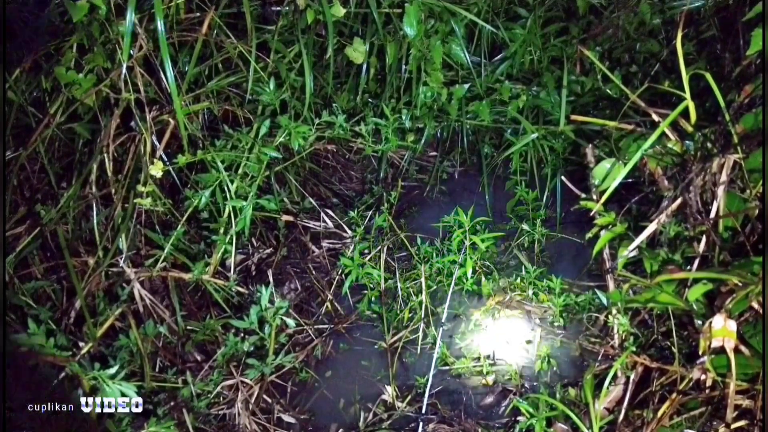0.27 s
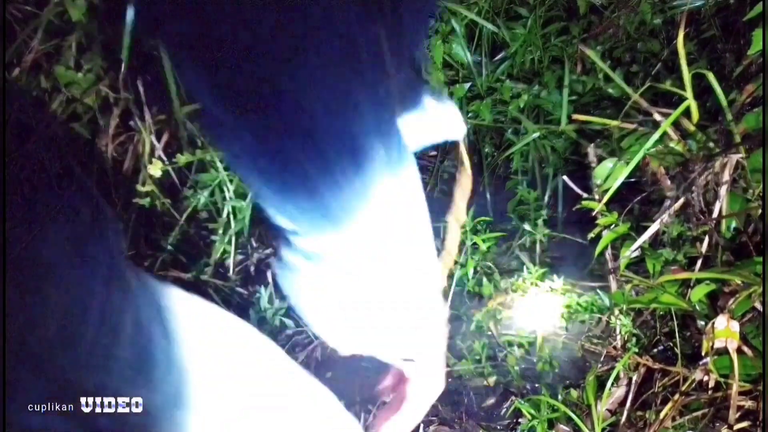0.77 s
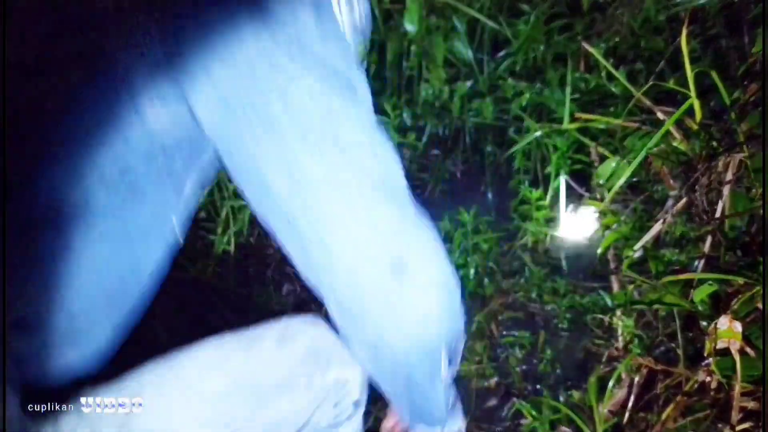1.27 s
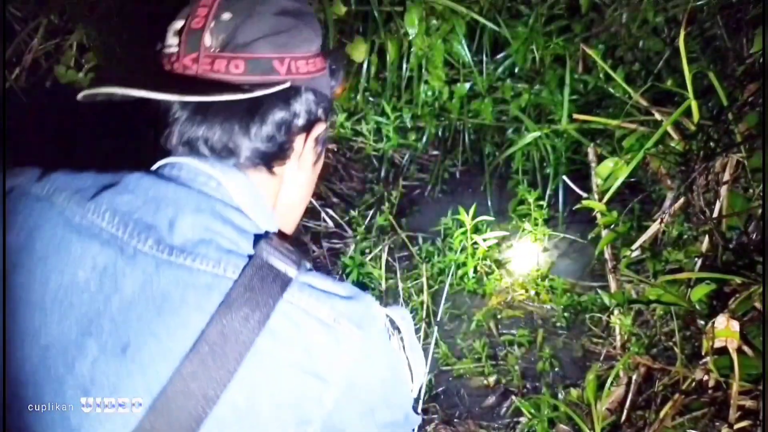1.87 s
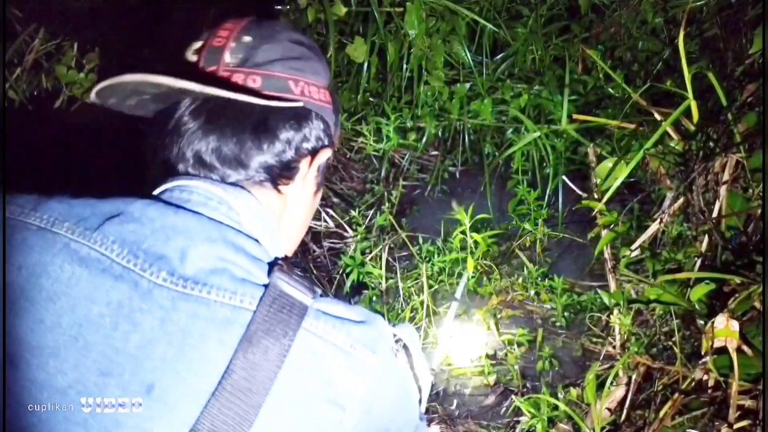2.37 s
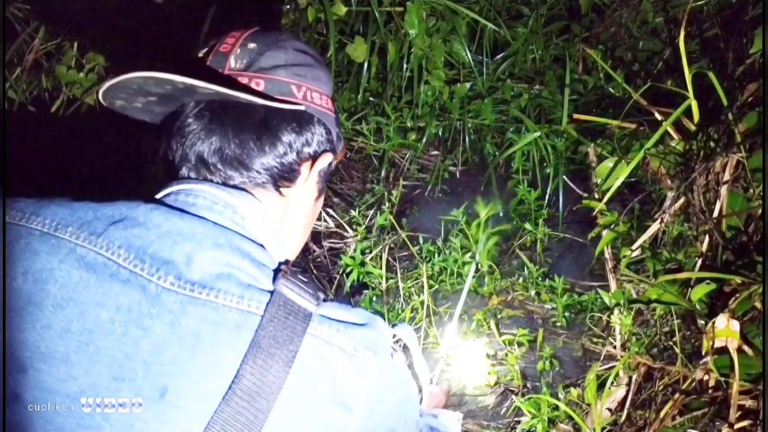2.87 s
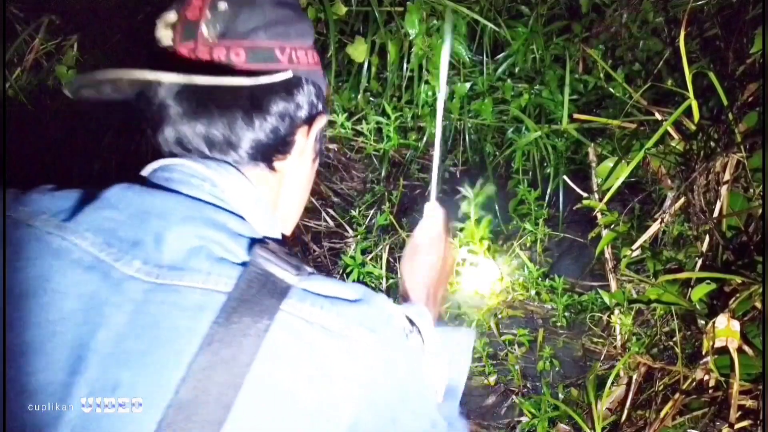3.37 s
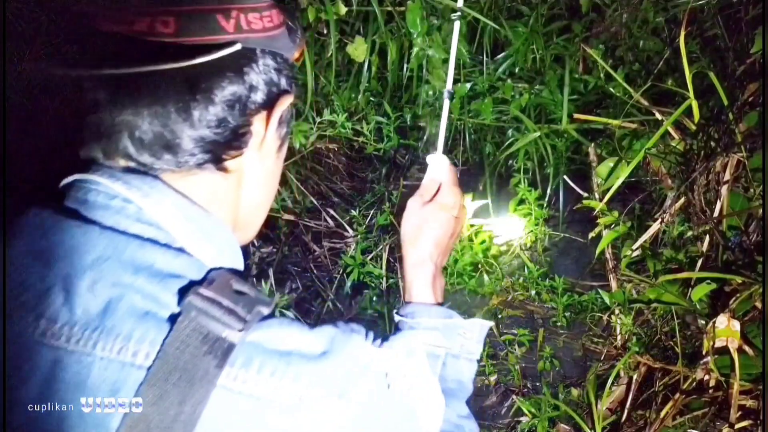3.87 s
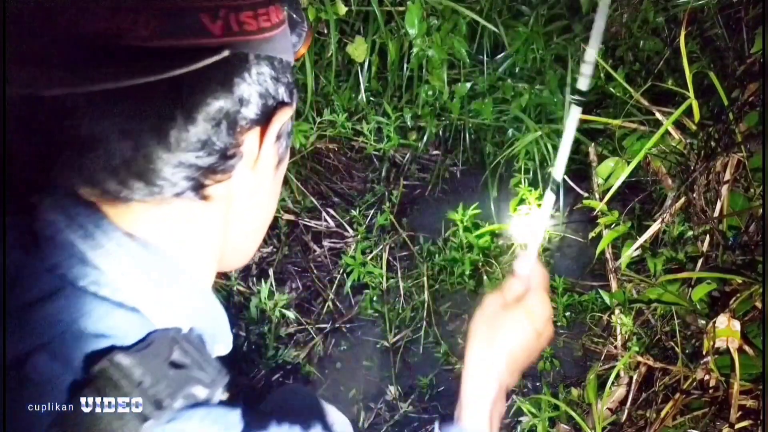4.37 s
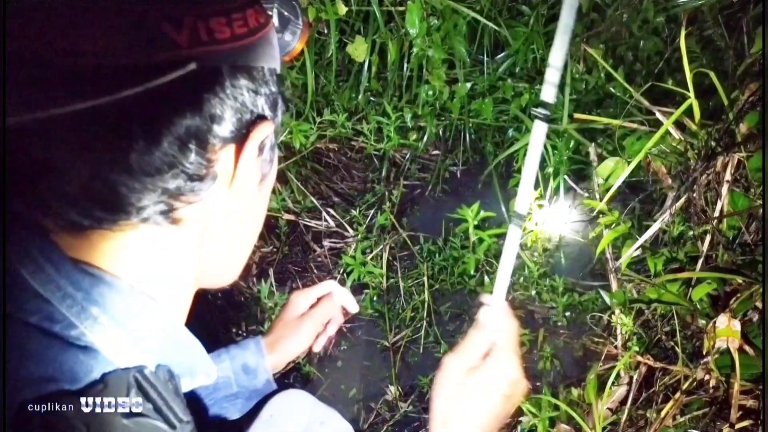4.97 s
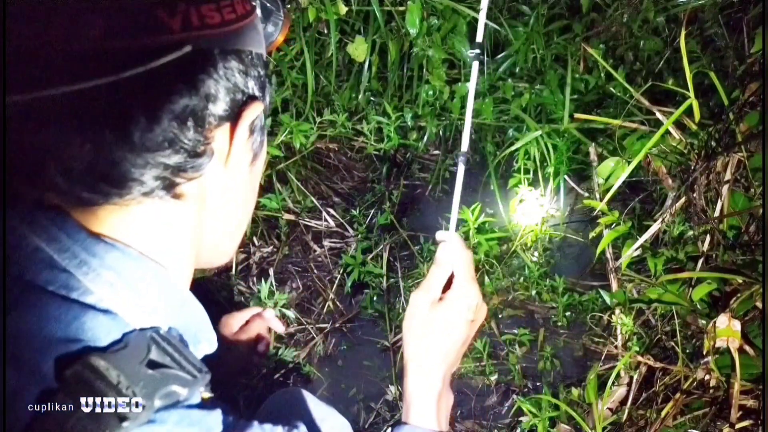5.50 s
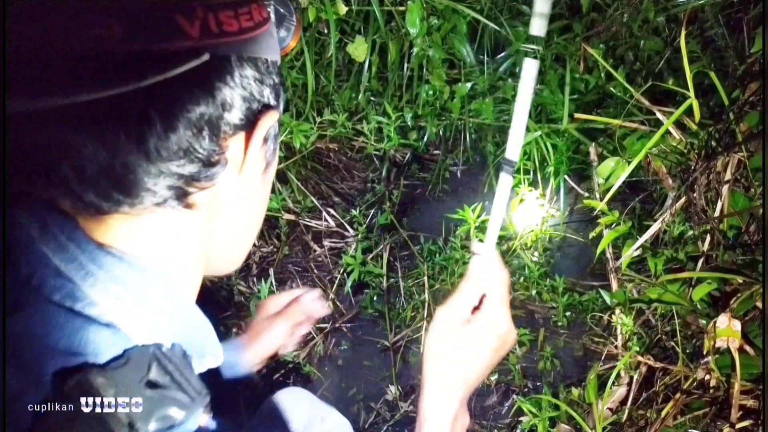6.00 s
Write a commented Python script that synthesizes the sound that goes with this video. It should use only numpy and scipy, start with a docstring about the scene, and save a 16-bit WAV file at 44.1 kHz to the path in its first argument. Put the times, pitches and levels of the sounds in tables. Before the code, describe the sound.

A stereo microphone low in wet grass hears steady high crickets and a blurred frog chorus. Loud piercing chirps, each high then low, come first from nearby on the left, among rustling, crackling grass and dull treads. They stop; softer, echoing whistles and dry rasping runs follow. A closer frog rasps about eight times a second, and small bubbles pop in mud late on.

```python
"""Quick two-note chirps of a frog close by are heard first, over steady crickets; later a farther frog chirps.
Far frogs rasp in overlapping runs that slow as they go, and a near one joins in loudly.
Whistles are gliding sine waves; rasps are clicks that ring a frog's sac and throat; crickets are pulsed tones.
Behind them a chorus croaks and peeps, and a far motor hums. Shaped noise makes the cloth, grass, thuds and air.
Near the end the wet mud gurgles twice, with rising tones and small popping bubbles."""
import sys
import numpy as np
from scipy import signal
from scipy.fft import rfft, irfft
from scipy.io import wavfile
from scipy.ndimage import uniform_filter1d

SR = 44100
rng = np.random.default_rng(int(sys.argv[2]) if len(sys.argv) > 2 else 0)


def master_out(mix):
    """Clip the mix to full scale and print it as 16-bit PCM to the path in sys.argv[1]."""
    frames = np.transpose(np.atleast_2d(mix))
    ceiling = np.clip(frames, -1, 1)
    pcm = np.round(ceiling * 32767).astype(np.int16)
    wavfile.write(sys.argv[1], SR, pcm)


N = 275182
TIME = np.arange(N) / SR  # seconds


def amp(db):
    """Turns decibels into a plain multiplier."""
    return 10 ** (np.asarray(db) / 20)


def unit(x):
    """Scales a sound to an average strength (rms) of 1."""
    return x / np.sqrt(np.mean(x ** 2) + 1e-20)


def read(points, hz):
    """Reads a curve of (pitch, value) points, evenly along the musical scale."""
    f, value = np.transpose(points)
    return np.interp(np.log(hz + 1), np.log(f + 1), value)


def add(mix, s, sound):
    """Adds a sound to the mix from second s, cut off at the end."""
    part = mix[..., max(round(s * SR), 0):][..., :sound.shape[-1]]
    part += sound[..., :part.shape[-1]]


def colour(x, spectrum):
    """Makes each pitch range stronger or weaker by a (pitch_hz, level_db) curve, to rms 1."""
    gain = amp(read(spectrum, np.fft.rfftfreq(N, 1 / SR)))
    return unit(irfft(rfft(x) * gain, N))


def wander(per_s):
    """A smooth random curve of rms 1; a higher per_s makes it move faster."""
    smoothing = 1 + (np.fft.rfftfreq(N, 1 / SR) / per_s) ** 4
    return unit(irfft(rfft(rng.standard_normal(N)) / smoothing, N))


def patchy(x, depth_db, size, order):
    """Lets narrow bands of a noise swell and fade on their own.

    size is the frame in samples; order is how many frames a patch lasts.
    """
    bands = signal.stft(x, nperseg=size)[2]
    field = rng.standard_normal(bands.shape[-2:])
    field = uniform_filter1d(field, order, axis=1)
    field = unit(uniform_filter1d(field, size=6, axis=0))
    return unit(signal.istft(bands * amp(depth_db * field), nperseg=size)[1][..., :N])


def ring(x, modes):
    """Makes a set of (pitch_hz, width_hz, level_db) resonances ring."""
    return sum(amp(db) * unit(signal.lfilter(*signal.iirpeak(hz, hz / width, SR), x))
               for hz, width, db in modes)


def place(x, lead_ms, left_db):
    """Places a sound left or right: lead_ms makes it sooner on the left, left_db louder there."""
    early = np.exp(1j * np.pi * np.fft.rfftfreq(N, 1 / SR) * lead_ms / 1000)
    sides = np.array([early * amp(left_db / 2), amp(-left_db / 2) / early])
    return irfft(rfft(x) * sides, N)


def scatter(x, t60, onset=0.0016):
    """Echoes off stalks and banks build up over onset s, then drop 60 dB in t60 s; each side differs."""
    t = TIME[:SR // 2]
    echoes = rng.standard_normal((2, len(t))) * (rng.random((2, len(t))) < .1)
    echoes *= amp(-60 * t / t60) * np.minimum(t / onset, 1) ** 2
    echoes /= np.linalg.norm(echoes, axis=1, keepdims=True)
    return signal.fftconvolve(np.atleast_2d(x), echoes, axes=1)[:, :N]


def gate(t, length, rise, fall):
    """Opens and shuts a note smoothly; all times in seconds."""
    opening = np.sin(np.pi / 2 * np.clip(t / rise, 0, 1)) ** 2
    closing = np.sin(np.pi / 2 * np.clip((length - t) / fall, 0, 1)) ** 2
    return opening * closing


# blur of the distant chorus, strength at each pitch: pitch_hz, level_db (relative, per Hz)
CHORUS_BLUR = [(100, -20), (250, -13), (500, -15.5), (1050, -16.5), (1600, -11.5), (2600, -11.5),
               (3150, -15), (3900, -9.5), (5750, -22), (7500, -19), (9800, -23), (14400, -19.5),
               (15000, -29), (15800, -35)]
# how alike left and right are: pitch_hz, likeness (0-1)
SIDE_LIKENESS = [(25, 0.34), (70, 0.72), (160, 1), (500, 0.018), (1200, 0.0083), (2500, 0.29),
                 (15000, 0.033)]
# level of the low rumble of the open air over time: time_s, level_db
RUMBLE_LEVEL = [(0, -53.5), (1.1, -50.5), (2.5, -55), (4.6, -52), (5.9, -55)]
# strength of that rumble at each pitch: pitch_hz, level_db (relative, per Hz)
RUMBLE_SPECTRUM = [(20, -3.5), (60, -4), (130, -5), (210, -7), (320, -34), (700, -74)]


def air(blur_db=-47, patch_db=4.5):
    """Open air rumbles low, and the distant chorus melts into an uneven noise."""
    likeness = np.clip(read(SIDE_LIKENESS, np.fft.rfftfreq(N, 1 / SR)), -1, 1)
    left, other = rfft(rng.standard_normal((2, N)))
    right = likeness * left + np.sqrt(1 - likeness ** 2) * other
    noise = irfft(np.array([left, right]), N)
    blur = patchy(colour(noise, CHORUS_BLUR), patch_db, size=1024, order=4) * amp(1.4 * wander(8.3))
    rumble = colour(noise[:, ::-1], RUMBLE_SPECTRUM)  # the same noise backwards
    return amp(blur_db) * blur + amp(np.interp(TIME, *np.transpose(RUMBLE_LEVEL))) * rumble


def motor(pitch_hz=161.7, level_db=-52, nearest_s=3.92, fade_s=1.02):
    """A far motor hums one wavering note; its strength halves within fade_s of its nearest moment."""
    phase = 2 * np.pi * np.cumsum(pitch_hz * (1 + 0.014 * wander(12))) / SR
    nearness = 1 / (1 + ((TIME - nearest_s) / fade_s) ** 2)
    return amp(level_db) * nearness * np.sin(phase) * amp(2.2 * wander(15))


# dry buzz of other insects in the grass: pitch_hz, level_db (relative, per Hz)
INSECT_BUZZ = [(5950, -32), (6300, 6), (7300, 2), (7600, -6), (7950, -10), (8300, 3), (8600, -4.5),
               (9100, -20), (9600, -64)]
# one row per cricket: pitch_hz (middle of its wing tone), level_db
CRICKET_VOICES = [(6490, -49), (6650, -52), (6730, -45.5), (6850, -53), (6940, -49), (7100, -57),
                  (7200, -46), (7300, -58.5)]


def crickets(stroke_hz=55, droop=0.034, swell_db=1.5, throb_db=1.0):
    """Every wing stroke is a short tone that sags in pitch; the grass smears the trills together."""
    out = amp(-46.5) * colour(rng.standard_normal((2, N)), INSECT_BUZZ) * amp(2 * wander(22))
    for pitch_hz, level_db in CRICKET_VOICES:
        stroke_rate = stroke_hz * rng.uniform(.6, 1.5) * (1 + .12 * wander(16.34))
        stroke = np.cumsum(stroke_rate) / SR % 1  # 0-1 through each stroke
        drift = .008 * wander(8) + .006 * wander(160)
        hz = pitch_hz * (1 + droop * (.5 - stroke) + drift)
        tone = np.sin(2 * np.pi * np.cumsum(hz) / SR)
        song = unit(np.sin(np.pi * stroke) ** 4 * tone * amp(swell_db * wander(16.0)))
        direct = place(song, rng.uniform(-0.15, 0.078), rng.uniform(-22.0, 3.7))
        out += amp(level_db) * unit(direct + amp(4) * scatter(song, t60=0.18))
    return out * amp(throb_db * wander(28))


# resonances of a whistling frog's vocal sac: pitch_hz, width_hz, level_db
WHISTLE_SAC = [(2645, 205, .2), (2880, 70, -3)]


def high_note(start_hz, length, tail_s, linger=1.0, climb=0.24, climb_s=0.025, flutter=0.77,
              break_s=0.00081, rise=0.0065):
    """A rising whistle swells as it passes each sac resonance, then breaks into a ragged tail."""
    t = TIME[:int((length + 4 * tail_s) * SR)]
    after = np.maximum(t - length, 0)
    shakes = np.sin(2 * np.pi * (rng.uniform(124, 344, (3, 1)) * t + rng.random((3, 1))))
    shake = shakes.sum(0) / np.sqrt(3)
    broken = 1 - np.exp(-after / break_s)
    hz = start_hz * (1 + climb * (1 - np.exp(-(t - after) / climb_s)))
    sac = np.sqrt(sum(amp(db) ** 2 / (1 + (2 * (hz - f) / width) ** 2) for f, width, db in WHISTLE_SAC))
    phase = 2 * np.pi * np.cumsum(hz * (1 + .02 * broken * shake)) / SR
    tail = broken * linger * np.exp(-after / tail_s) * (1 + flutter * shake)
    level = gate(t, t[-1], rise, tail_s) * (1 - broken + tail)
    return level * sac * (np.sin(phase) + amp(-40) * np.sin(4 * phase))


def croak(hz, pulse_hz=280, width_hz=260):
    """A short rough note: pulsing air through one throat resonance."""
    t = TIME[:int(.024 * SR)]
    puffs = rng.standard_normal(len(t)) * np.sin(np.pi * pulse_hz * rng.uniform(0.75, 1.39) * t) ** 2
    throat = [(hz, width_hz, 0)]
    voice = unit(ring(ring(puffs, throat), throat)) / np.sqrt(2)
    return gate(t, t[-1], t[-1] / 6, t[-1] / 2) * voice


# croaks that stand out from the chorus: start_s, level_db
CLEAR_CROAKS = [(1.465, -33), (1.605, -33.5), (1.886, -37), (2.0186, -33), (2.1763, -32), (6.2, -39)]


def chorus(croaks_per_s=22, croak_db=-49, peeps_per_s=4, peep_db=-50, spread_db=8):
    """Many distant frogs croak and peep at random on either side; a few croaks stand out."""
    sides = np.zeros((2, N))
    for start_s, level_db in CLEAR_CROAKS:
        add(sides[0], start_s, amp(level_db) * croak(1600 * rng.uniform(0.98, 1.06)))
    for when, pitch, size, side in rng.random((int(croaks_per_s * N / SR), 4)):
        one = amp(croak_db + spread_db * size) * croak(1400 + 550 * pitch)
        add(sides[int(2 * side)], when * N / SR, one)
    for when, pitch, size, side in rng.random((int(peeps_per_s * N / SR), 4)):
        one = amp(peep_db + spread_db * size) * high_note(2250 + 250 * pitch, 0.015, 0.0089)
        add(sides[int(2 * side)], when * N / SR, one)
    direct = place(sides[0], lead_ms=0.21, left_db=1.5) + place(sides[1], lead_ms=-0.33, left_db=-1.0)
    return direct + amp(-6.0) * scatter(sides.sum(0), t60=0.1)


# treads on the bank: start_s, level_db (before the thud's rise and fall)
BANK_TREADS = [(0.003, -38), (0.09, -37), (0.31, -43), (1.028, -29), (1.191, -28), (1.389, -38),
               (1.622, -41)]
# strength of a thud at each pitch: pitch_hz, level_db (relative, per Hz)
THUD_SPECTRUM = [(60, -29), (200, 6.5), (350, 2.5), (550, 4), (900, -11), (1500, -4), (3000, -13)]


def treads(rise=0.0059, decay=0.0097):
    """Weight comes down on the soft bank with a dull thud of low noise."""
    out, t = np.zeros(N), TIME[:SR // 10]
    for start_s, level_db in BANK_TREADS:
        thud = colour(rng.standard_normal(N), THUD_SPECTRUM)[:len(t)]
        add(out, start_s, amp(level_db) * thud * gate(t, t[-1], rise, decay) * np.exp(-t / decay))
    return out


# shifts of the body: start_s, rise_s, hold_s, decay_s, cloth_db, grass_db
BODY_SHIFTS = [(0, 0.00043, 0.0069, 0.15, -37, -44), (0.126, 0.054, 0.13, 0.035, -46.5, -45),
               (0.291, 0.31, 1.26, 0.22, -47.5, -56.5), (0.945, 0.069, 0.11, 0.041, -38, -41),
               (1.153, 0.031, 0.019, 0.24, -43.5, -40), (1.23, 0.097, 0.0083, 0.082, -33, -63),
               (1.87, 0.025, 0.0046, 0.018, -35.5, -61), (2.185, 0.086, 0.012, 0.022, -27.5, -41.5),
               (2.288, 0.017, 0.019, 0.02, -28.5, -40), (2.33, 0.03, 0.98, 0.1, -55, -68),
               (3.302, 0.11, 0.084, 0.018, -36.5, -48), (3.496, 0.038, 1.2, 1.8, -47, -67.5),
               (6.081, 0.042, 0.006, 0.044, -39.5, -47.5), (6.185, 0.017, 0.039, 0.03, -49, -53)]


def moving():
    """Gains of cloth and grass: every shift of the body rises, holds and dies away."""
    cloth, grass = np.zeros((2, N))
    for start_s, rise_s, hold_s, decay_s, cloth_db, grass_db in BODY_SHIFTS:
        t = TIME - start_s
        push = np.clip(t / rise_s, 0, 1) ** 2 * np.exp(-np.maximum(t - rise_s - hold_s, 0) / decay_s)
        cloth = np.hypot(cloth, amp(cloth_db) * push)
        grass = np.hypot(grass, amp(grass_db) * push)
    return cloth, grass


# strength of brushing cloth at each pitch: pitch_hz, level_db (relative, per Hz)
CLOTH_SPECTRUM = [(880, -49), (1500, -24), (2900, -2.5), (3170, -16.5), (3500, -3), (5290, -13),
                  (7110, -5.5), (15800, -14.5)]
# strength of crushed grass at each pitch: pitch_hz, level_db (relative, per Hz)
GRASS_SPECTRUM = [(40, -23), (150, -4), (260, 6), (480, 9), (800, 4), (1150, 2), (1600, 4), (2200, 1),
                  (4000, 2.5), (8000, -54)]
# snapping stalks: start_s, level_db (before the left-right balance)
STALK_SNAPS = [(0.186, -34.5), (1.097, -26), (1.112, -37), (1.198, -41), (1.253, -35), (1.326, -31),
               (1.628, -33), (1.648, -37), (1.9, -31), (2.328, -23)]
# strength of a snap at each pitch: pitch_hz, level_db (relative, per Hz)
SNAP_SPECTRUM = [(200, -4), (600, -7), (3000, -11), (7000, 1), (15000, -14)]


def movements(ticks_per_s=400):
    """Cloth brushes in dense grains, grass scrapes and crackles underfoot, and stalks snap."""
    grain = amp(2.6 * wander(400) + 1.8 * wander(40))
    cloth, grass = moving()
    swish = colour(rng.standard_normal((2, N)) * grain, CLOTH_SPECTRUM) * cloth

    ticks = (rng.random(N) < ticks_per_s / SR) * rng.choice([-1, 1], N)
    ticks = ticks * amp(5 * np.minimum(rng.exponential(1, N), 3))  # a few are much stronger
    tick_shape = rng.standard_normal(400) * np.exp(-TIME[:400] / .0015)
    crackle = unit(signal.fftconvolve(ticks, tick_shape)[:N])
    crush = colour(crackle + .5 * grain * rng.standard_normal((2, N)), GRASS_SPECTRUM)
    crush = patchy(crush, 1.2, size=512, order=3) * grass

    t, snaps = TIME[:N // 200], np.zeros((2, N))
    for start_s, level_db in STALK_SNAPS:
        crack = colour(rng.standard_normal((2, N)), SNAP_SPECTRUM)[:, :len(t)]
        add(snaps, start_s, amp(level_db) * crack * np.exp(-t / .002))
    balance = amp([[2.2], [-2.2]])  # louder on the left
    return (swish + snaps) * balance + crush


# mud gurgles: start_s, length_s, pitch_hz (at the start), start_db, end_db
MUD_GURGLES = [(5.68, 0.036, 331, -49.5, -41), (5.704, 0.094, 412, -39.5, -46.5),
               (6.105, 0.053, 298, -46, -50)]
# strength of spitting mud at each pitch: pitch_hz, level_db (relative, per Hz)
SPIT_SPECTRUM = [(200, -37), (700, 9), (1400, 0), (2500, -19), (6000, -25)]
# bubbles popping in the mud: start_s, pitch_hz, level_db (before the pop's rise and fall)
BUBBLE_POPS = [(5.711, 1280, -30.5), (5.788, 1300, -45), (6.131, 710, -38), (6.198, 820, -41)]


def gurgles(shrink=0.9, wobble=0.061, sputter_db=1.0, spit_db=-5, pop_decay_s=0.0054):
    """An air pocket in wet mud shrinks ever faster, so its ring rises; the mud spits and bubbles pop."""
    dry, spray = np.zeros((2, N))
    for start_s, length_s, pitch_hz, start_db, end_db in MUD_GURGLES:
        u = TIME[:int(length_s * SR)] / length_s  # 0-1 through the gurgle
        size = 1 - shrink * u ** 2.7
        hz = pitch_hz / size * (1 + wobble * u * wander(290)[:len(u)])
        phase = 2 * np.pi * np.cumsum(hz) / SR
        tone = np.sin(phase) + amp(-18) * np.sin(2 * phase) + amp(-15) * np.sin(3 * phase)
        level = amp(start_db + (end_db - start_db) * u + sputter_db * wander(200)[:len(u)])
        level = level * signal.windows.tukey(len(u), .1)  # soft ends
        add(dry, start_s, level * tone)
        add(spray, start_s, level * u)
    spits = rng.standard_normal(N) * (rng.random(N) < 500 / SR)
    dry += amp(spit_db) * spray * colour(spits, SPIT_SPECTRUM)
    t = TIME[:int(.04 * SR)]
    for start_s, pitch_hz, level_db in BUBBLE_POPS:
        pop = np.sin(2 * np.pi * pitch_hz * t) * gate(t, t[-1], 0.0014, .01) * np.exp(-t / pop_decay_s)
        add(dry, start_s, amp(level_db) * pop)
    return dry + amp(-10.5) * scatter(dry, t60=0.077)


# far frog's whistles: start_s, level_db (before the sac), length_s, tail_s (decay of the tail)
FAR_WHISTLES = [(2.955, -37.5, 0.0087, .003), (3.284, -28.5, 0.0058, 0.003), (3.638, -33.5, 0.013, .003),
                (3.79, -31.5, 0.0072, 0.0035), (3.902, -32, 0.023, 0.0046), (4.052, -38, .01, 0.0044),
                (4.165, -33, 0.036, .005), (4.429, -31.5, 0.032, .006), (4.687, -31, 0.025, 0.021),
                (4.952, -31.5, 0.034, .006), (5.22, -31.5, 0.032, 0.0034), (5.383, -32.5, 0.011, 0.0035),
                (5.504, -31, 0.027, 0.01), (5.858, -34, 0.01, 0.002)]


def far_frog(grass_db=-7):
    """The far frog gives the high note alone, blurred by echoes in the grass."""
    dry = np.zeros(N)
    for start_s, level_db, length_s, tail_s in FAR_WHISTLES:
        note = high_note(2400 * rng.uniform(1.0, 1.02), length_s, tail_s)
        add(dry, start_s, amp(level_db) * note)
    return place(dry, lead_ms=-0.097, left_db=2.5) + amp(grass_db) * scatter(dry, t60=0.24)


# runs of far rasps: first_s, last_s, count (rasps), slowing (0-1), sac_db, throat_db,
# fade_db (drop by the last rasp; below zero means louder)
FAR_RASP_RUNS = [(0.084, 0.531, 5, 0.02, -45.5, -58, 1), (0.138, 0.843, 7, 0.17, -55.5, -81, -4),
                 (1.095, 2.084, 9, 0.07, -48, -48, -0.5), (1.496, 2.132, 6, 0.1, -49.5, -59, -4.5),
                 (2.384, 3.098, 7, 0.12, -47.5, -51, -1), (3.218, 3.694, 5, 0.1, -47.5, -54.5, 0.5),
                 (2.439, 4.023, 14, 0.07, -54, -58.5, -4.5), (4.102, 5.716, 14, 0.07, -51.5, -55, 6)]


def rasp_runs():
    """Lists every far rasp as (start_s, sac_db, throat_db): each run slows and its level shifts."""
    rasps = []
    for first_s, last_s, count, slowing, sac_db, throat_db, fade_db in FAR_RASP_RUNS:
        for u in np.linspace(0, 1, round(count)):
            elapsed = (last_s - first_s) * u * (1 - slowing * (1 - u))
            fade = fade_db * u ** 3
            rasps.append((first_s + elapsed, sac_db - fade, throat_db - fade))
    return rasps


# resonances of a rasping frog's sac, before each rasp varies them: pitch_hz, width_hz, level_db
SAC_RESONANCES = [(3640, 46, 5), (3890, 79, 12.5), (4137, 290, 3), (4950, 340, -3), (7840, 900, -3)]
# resonances of its throat: pitch_hz, width_hz, level_db
THROAT_RESONANCES = [(1633, 330, 0.17), (2055, 390, -1), (2437, 120, -0.4)]


def rasping(rasps, hold, decay, stretch, tone_db, tone_left_db, sac_left_db, throat_left_db,
            pulse_hz=272, tone_hz=3875, tone_s=0.025, stalks_db=-6, throat_rise=0.0014):
    """Uneven clicks ring the sac and throat; a clear sac tone sings through the start of each rasp."""
    sac, throat = np.zeros((2, 2, N))
    t = TIME[:int(.09 * SR)]
    for start_s, sac_db, throat_db in rasps:
        fading = np.exp(-np.maximum(t - hold * rng.uniform(1, 1.7), 0) / decay)
        push = np.clip(t / 0.00075, 0, 1) * fading
        turns = np.cumsum(pulse_hz * (rng.uniform(.9, 1.1) + rng.standard_normal(len(t)))) / SR
        size = rng.normal(1, stretch)  # the sac is stretched a little differently every time
        clicks = np.diff(np.floor(np.maximum.accumulate(turns + .75)), prepend=0)  # one for each whole turn
        # each click finds its own way through the stalks to each side
        strength = np.tanh(3 * rng.normal(0.66, 1, (2, len(t))))
        drive = push * (unit(clicks * strength) + .55 * rng.standard_normal((2, len(t))))

        tone = gate(t, tone_s, 0.0012, 0.0096) * np.sin(2 * np.pi * tone_hz * size * t)
        tone = tone * (1 + .5 * np.sin(2 * np.pi * turns)) * amp([[tone_left_db], [0]])
        modes = [(hz * size * rng.normal(1, .012), width, db + rng.normal(0, 2.5))
                 for hz, width, db in SAC_RESONANCES]
        add(sac, start_s, amp(sac_db) * unit(unit(ring(drive, modes)) + amp(tone_db) * unit(tone)))
        throat_drive = drive * (1 - np.exp(-t / throat_rise))
        add(throat, start_s, amp(throat_db) * unit(ring(throat_drive, THROAT_RESONANCES)))
    sac = signal.sosfilt(signal.butter(3, [2700, 8500], "band", fs=SR, output="sos"), sac)
    throat = signal.sosfilt(signal.butter(4, [1300, 3200], "band", fs=SR, output="sos"), throat)
    direct = place(sac, lead_ms=-0.036, left_db=sac_left_db)
    direct = direct + place(throat, lead_ms=-0.25, left_db=throat_left_db)
    stalks = amp(stalks_db) * scatter(direct, t60=.03, onset=.001)
    return direct + stalks + amp(-15) * scatter(direct, t60=.25, onset=.02)


# rasps of the near frog: start_s, level_db (of the sac, before filtering)
CLOSE_RASPS = [(4.18, -40), (4.269, -36), (4.38, -35.5), (4.492, -35), (4.604, -33.5), (4.723, -34.5),
               (4.844, -33.5), (4.969, -34), (5.098, -35), (5.2292, -35), (5.354, -34.5), (5.482, -36),
               (5.626, -37.5), (5.776, -36.5)]


def rasping_frogs(near_throat_db=-7):
    """A near frog's clear tone sits on the right; far rasps die away sooner and vary more in pitch."""
    near = [(start_s, level_db, level_db + near_throat_db) for start_s, level_db in CLOSE_RASPS]
    close = rasping(near, hold=0.014, decay=0.018, stretch=0.0086, tone_db=-4.5,
                    tone_left_db=-34, sac_left_db=0, throat_left_db=0.7)
    far = rasping(rasp_runs(), hold=.013, decay=.009, stretch=.032, tone_db=-11,
                  tone_left_db=0, sac_left_db=.5, throat_left_db=2.5)
    return close + far


def low_note(start_hz, climb=0.16, length=0.023, flutter=0.098, warble=0.0093, swell_db=4):
    """A fluttering, rising sine wave whose level changes by swell_db along the way."""
    t = TIME[:int(length * SR)]
    shakes = np.sin(2 * np.pi * (rng.uniform(79, 330, (2, 1)) * t + rng.random((2, 1))))
    shake = shakes.sum(0) / np.sqrt(2)
    hz = start_hz * (1 + climb * t / length + warble * shake)
    level = gate(t, length, 0.0013, 0.007) * amp(swell_db * (t / length - .5)) * (1 + flutter * shake)
    return level * np.sin(2 * np.pi * np.cumsum(hz) / SR)


# chirps of the near frog: start_s, level_db (high note, before the sac), length_s (high note),
# tail_s (decay of its tail), low_db (low note), low_hz (low note's starting pitch)
NEAR_CHIRPS = [(0.04, -12.5, 0.014, 0.0039, -25, 1760), (0.282, -12, 0.02, 0.0052, -29.5, 1755),
               (0.49, -13, 0.017, 0.003, -25, 1754), (0.6946, -11, 0.019, 0.009, -26, 1790),
               (0.858, -11.5, 0.012, 0.004, -24, 1785), (1.003, -11, 0.021, .011, -24, 1840),
               (1.3348, -11.5, 0.018, 0.014, -25, 1790), (1.545, -12, 0.02, 0.011, -25, 1817),
               (1.725, -11.5, 0.023, 0.011, -27, 1790), (1.94, -14, 0.014, 0.0025, -27, 1720),
               (2.104, -10.5, 0.024, 0.016, -25.5, 1815)]


def near_frog(throat_db=-38, grass_db=-18, bank_db=-22, overlap_s=0.00108):
    """Each chirp is a high whistle with a low one on its heels; a harder chirp starts higher."""
    high, low = np.zeros((2, N))
    for start_s, level_db, length_s, tail_s, low_db, low_hz in NEAR_CHIRPS:
        start_hz = 2521 + 50 * (level_db + 11)  # 50 Hz higher for each dB above -11 dB
        add(high, start_s, amp(level_db) * high_note(start_hz, length_s, tail_s, linger=0.46))
        add(low, start_s + length_s - overlap_s, amp(low_db) * low_note(low_hz))
        rattle = low_note(1967, climb=0.015, length=0.035, flutter=0.86, warble=0.19, swell_db=-9.5)
        add(low, start_s - .003, amp(throat_db) * rattle)  # the throat rattles
    direct = place(high, lead_ms=0.49, left_db=3.0) + place(low, lead_ms=0.567, left_db=3.0)
    grass = amp(grass_db) * scatter(high + low, t60=0.13)
    return direct + grass + amp(bank_db) * scatter(high + 2 * low, t60=0.23, onset=0.0045)


def scene():
    """Adds all the sounds together, from the background to the near frog."""
    background = air() + motor() + crickets() + chorus()
    bank = treads() + movements() + gurgles()
    return background + bank + far_frog() + rasping_frogs() + near_frog()


def record(dry):
    """Takes away the treble above about 15800 Hz with a steep filter."""
    treble_cut = signal.firwin(511, 15800, window=("kaiser", 9), fs=SR)
    return signal.oaconvolve(dry, treble_cut[None], "same")


dry = scene()
out = record(dry)
master_out(out)
```